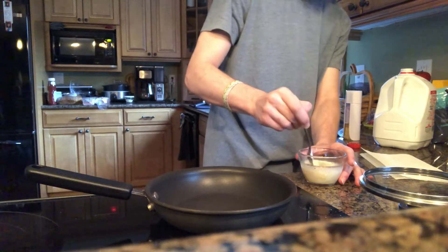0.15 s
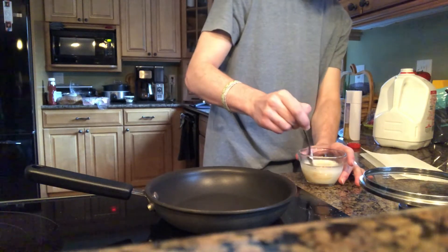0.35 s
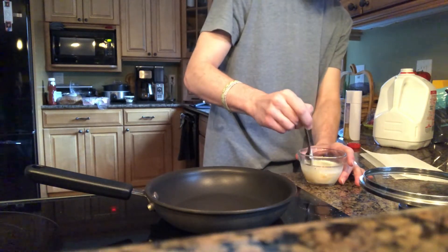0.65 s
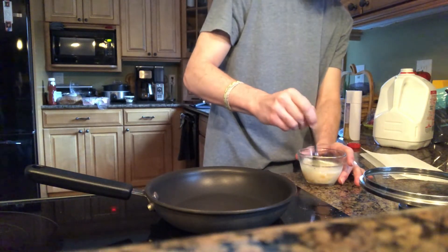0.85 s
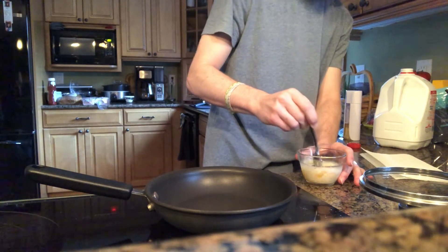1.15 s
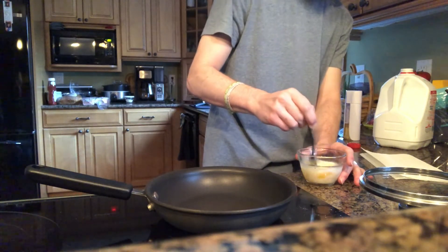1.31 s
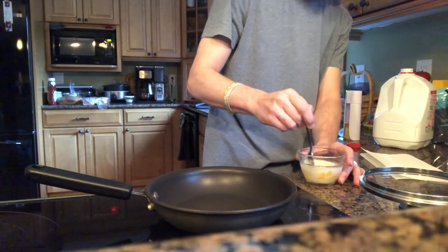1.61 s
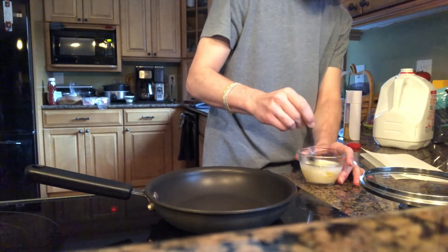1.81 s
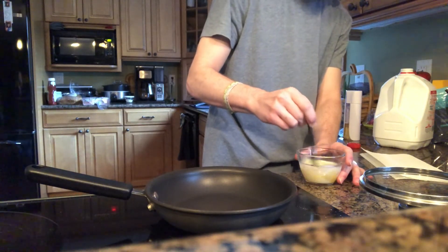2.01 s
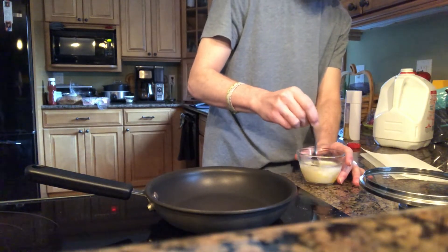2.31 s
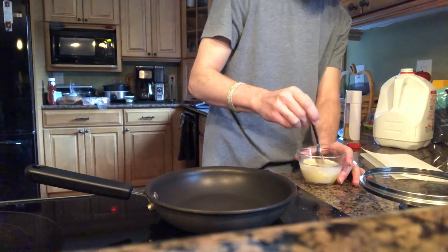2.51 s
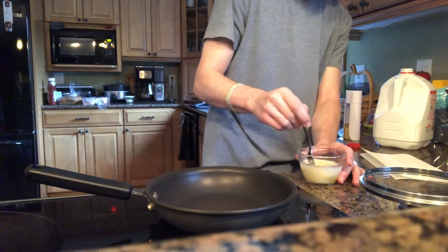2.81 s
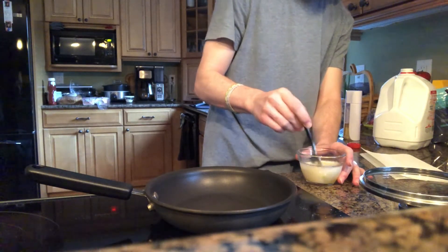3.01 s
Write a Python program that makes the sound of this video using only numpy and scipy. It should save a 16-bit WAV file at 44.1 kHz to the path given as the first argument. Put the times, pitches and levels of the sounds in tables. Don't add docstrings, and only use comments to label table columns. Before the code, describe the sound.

Fork tines click in a glass bowl of egg after two ringing rim taps, over kitchen hum.

```python
import sys
import numpy as np
from scipy import signal
from scipy.fft import rfft, irfft
from scipy.io import wavfile
from scipy.ndimage import uniform_filter1d

SR = 44100
rng = np.random.default_rng(int(sys.argv[2]) if len(sys.argv) > 2 else 0)


def level_to_linear(level):
    exponent = np.asarray(level, float) / 20
    return 10 ** exponent


def transcribe(u):
    v = np.clip(np.atleast_2d(u).T, -1, 1)
    q = np.round(v * 32767).astype(np.int16)
    wavfile.write(sys.argv[1], SR, q)


N = 138915
T = np.arange(SR // 2) / SR
UPPER_HZ, TOP_HZ = 8000, 12000
RUMBLE_HZ, CUT_HZ, EDGE_HZ = 42, 15800, 16950


def ring(hz, db, t60, rise=0.00013, phase=0.):
    decay = level_to_linear(db - 60 * T / max(t60, 1e-3))
    return decay * (1 - np.exp(-T / rise)) * np.sin(2 * np.pi * hz * T + phase)


def add(out, x, s):
    i = int(s * SR)
    out[i:i + len(x)] += x[:N - i]


def band(x, lo_hz, hi_hz):
    return signal.sosfilt(signal.butter(3, [lo_hz, hi_hz], "band", fs=SR, output="sos"), x)


def crack(db, t60, lo_hz):
    return band(rng.standard_normal(len(T)), lo_hz, EDGE_HZ) * level_to_linear(db - 60 * T / t60)


def waver():
    depth_db, k = 2, int(0.006 * SR)
    walk = uniform_filter1d(rng.standard_normal(len(T)), size=k)
    walk = uniform_filter1d(walk, size=k)
    return level_to_linear(depth_db * np.sqrt(3.25 * k) * walk)


# start in seconds, peak in dB, contact pitch in Hz,
# upper modes in dB, top modes in dB.
BLOWS = [(0.7129, -36, 6580, 8.5, 2), (0.8345, -33.5, 6170, 5, 1), (0.9508, -32.5, 6380, 5.5, 0.5),
         (0.9865, -32, 6330, 3.5, 2.5), (1.0732, -28.5, 6460, 3.5, 4), (1.1268, -28.5, 6430, -35, 4.5),
         (1.494, -30, 6260, 2.5, -2.5), (1.554, -30, 6340, 0.5, 2), (1.6991, -41, 6370, 7, 5),
         (1.8328, -35, 6440, 10.5, 5), (1.9839, -33, 6470, 5.5, 5), (2.2126, -28.5, 6460, 6.5, 2),
         (2.4671, -25.5, 6500, 4.5, 1.5), (2.624, -27.5, 6180, 4.5, 2), (2.855, -34.5, 6160, 8.5, 7)]
# start in seconds, peak in dB, contact pitch in Hz,
# upper modes in dB, top modes in dB.
GRAZES = [(0.661, -39, 6830, 5, -8), (0.8204, -39, 6700, 6, -1), (1.272, -31.5, 7100, 0.5, -9),
          (1.287, -43.5, 7550, 6, 4), (1.3578, -42.5, 6960, 2, -19), (1.3645, -31.5, 6870, 1, 1.5),
          (1.6723, -41.5, 6700, 4, -2), (1.7922, -38, 6460, 3, 4), (2.0928, -39.5, 6900, 2.5, -3),
          (2.107, -49, 5930, 7, -9), (2.2762, -44, 6800, 5, -9), (2.388, -39.5, 6350, -4, -1),
          (2.5321, -39, 6900, 5.5, -2), (2.9941, -31, 6430, -6, -7), (3.001, -51, 5900, -2, -6),
          (3.1261, -29.5, 6540, 1, -4)]
# pitch in Hz, level in dB, decay time t60 in seconds.
WET_HZ = [1850, 3600, 4400, 5399, 8400, 10550, 11200, 12800, 14960, 15500]
WET_DB = [-21.5, -19, -20, -13, -22, -16, -22, -13, -6.5, -8]
WET_T60_S = [.02, .005, .02, .008, .008, .009, .006, .007, .006, .006]
CONTACT_T60_S, CONTACT_SAG = .008, .06
CRACK_DB, CRACK_T60_S = -13, 0.0094
WASH_DB, WASH_T60_S = -21.5, 0.073
RATTLE_DB, RATTLE_T60_S = -26, 0.02
ECHO_S, ECHO_DB = .0066, -8
SCATTER_DB = 1.8


def tines(rows, low_db, crack_hz):
    out = np.zeros(N)
    for s, db, hz, upper_db, top_db in rows:
        chance = rng.standard_normal((len(WET_DB), 3))
        sagging_hz = hz * (1 - CONTACT_SAG * np.tanh(T / CONTACT_T60_S))
        x = ring(hz, -1.95, CONTACT_T60_S) + ring(sagging_hz, -15.5, 0.5 * CONTACT_T60_S)

        snap = crack(CRACK_DB, CRACK_T60_S, crack_hz) + crack(WASH_DB, WASH_T60_S, crack_hz)
        x = x + level_to_linear(-1.0) * band(snap, crack_hz, UPPER_HZ)
        x = x + level_to_linear(upper_db) * band(snap, UPPER_HZ, TOP_HZ)
        x = x + level_to_linear(top_db) * (band(snap, TOP_HZ, CUT_HZ) + level_to_linear(-24) * band(snap, CUT_HZ, EDGE_HZ))

        for f, mode_db, t60, (a, b, p) in zip(WET_HZ, WET_DB, WET_T60_S, chance):
            if f > TOP_HZ:
                tilt_db = top_db
            elif f > UPPER_HZ:
                tilt_db = upper_db
            else:
                tilt_db = 0 if f > 5800 else low_db
            struck_hz = f * (1 + 0.022 * b * (t60 < .03))
            x = x + ring(struck_hz, mode_db + tilt_db + SCATTER_DB * a, t60, phase=9 * p)

        push = rng.standard_normal(len(T)) * level_to_linear(RATTLE_DB - 60 * T / RATTLE_T60_S)
        push[0] = 1
        push[int(SR * ECHO_S * (1 + .06 * chance[0, 1]))] += level_to_linear(ECHO_DB)
        add(out, level_to_linear(db) * signal.fftconvolve(x, push)[:len(T)], s)
    return out


# start in seconds, slow mode in dB,
# wall pair in dB, foot mode in dB.
RINGS = [(0.7144, -75, -66, -60), (0.8338, -75, -67.5, -50), (0.9508, -69, -69, -50),
         (0.9865, -65, -68, -40.5), (1.0752, -60, -63, -41), (1.1288, -78, -56.5, -40),
         (1.3645, -70, -64, -47), (1.492, -66, -71, -42), (1.553, -68, -67, -51), (1.6991, -83, -61, -54),
         (1.8328, -74, -65, -49), (1.983, -67, -65, -50), (2.2107, -57, -57, -43), (2.388, -75, -66, -67),
         (2.466, -72, -54, -46), (2.624, -56, -71, -42), (2.855, -58, -59.5, -41), (3.1261, -68, -62, -57)]
# start in seconds, pitch in Hz, level in dB.
HIGH_RINGS = [(0.66, 10700, -57), (0.7129, 8270, -60), (0.9865, 13100, -58), (1.0745, 10500, -54),
              (1.126, 12230, -60), (1.1276, 8500, -58), (1.554, 11030, -62), (1.554, 8340, -60),
              (1.6991, 12700, -65), (1.6986, 8400, -61), (1.7922, 10600, -56.5), (1.8328, 10400, -58),
              (2.624, 10600, -50), (2.625, 8800, -58), (2.856, 10550, -55), (2.9941, 8500, -58),
              (2.9941, 12150, -53.5), (3.1261, 10650, -51)]
SLOW_HZ, SLOW_T60_S = 4818, .2
PAIR_HZ, PAIR_T60_S = (6100, 6385), .16
FOOT_HZ, FOOT_T60_S = 1390, .035
HIGH_WIDTH_HZ, HIGH_T60_S = 200, .12


def rings():
    out = np.zeros(N)
    for s, slow_db, pair_db, foot_db in RINGS:
        pair = sum(waver() * ring(f, pair_db, PAIR_T60_S, phase=9 * rng.random()) for f in PAIR_HZ)
        slow = waver() * ring(SLOW_HZ, slow_db, SLOW_T60_S, rise=0.0059)
        foot = ring(FOOT_HZ, foot_db, FOOT_T60_S, rise=0.0016)
        add(out, pair + slow + foot, s)
    for s, hz, db in HIGH_RINGS:
        add(out, band(crack(db + 15.5, HIGH_T60_S, 5000), hz - HIGH_WIDTH_HZ, hz + HIGH_WIDTH_HZ), s)
    return out


# start in seconds, peak in dB, upper modes in dB, long-ringing modes in dB.
TAPS = [
    (0.2353, -24, -1.5, -7),
    (0.3748, -33, -3.5, 0),
]
# pitch in Hz, level in dB, decay time t60 in seconds.
RIM_HZ = [1897, 1985, 2094, 2232, 4738, 4818, 4856, 7973, 8700, 8810, 8755, 10650, 13670, 13720]
RIM_DB = [-4, -15.5, -12.5, -12.5, -6, -6.5, -5, -10.5, 3, 4, -31, -11, -4, -21.5]
RIM_T60_S = [.05, .3, .06, .04, .07, .26, .06, .025, .08, .06, .17, .03, .05, .11]
# pitch in Hz, level in dB, decay time t60 in seconds.
BASE = [(741, -12.5, 0.23), (1090, -8, 0.023), (1445, -3, 0.022), (1770, -2.5, 0.017), (3320, -5, 0.013)]
SET_DOWN_S, SET_DOWN_DB = .279, -21.5
ROCK_S, ROCK_DB = 0.00643, 3.5


def rim():
    out = np.zeros(N)
    for s, db, upper_db, long_db in TAPS:
        x = band(crack(0, 0.025, 800), 800, 12000) + crack(-11.5, 0.0096, 9500)
        x = x + band(crack(-17, 0.16, 2900), 2400, 7100) + band(crack(6, .03, 5200), 5800, 7300)
        for f, mode_db, t60 in zip(RIM_HZ, RIM_DB, RIM_T60_S):
            is_long = t60 > .15
            level_db = mode_db + upper_db * (f > 6000) + long_db * is_long
            x = x + (waver() if is_long else 1) * ring(f, level_db, t60, phase=9 * rng.random())
        add(out, level_to_linear(db) * x, s)

    foot = level_to_linear(SET_DOWN_DB) * sum(ring(f, mode_db, t60, rise=0.0015) for f, mode_db, t60 in BASE)
    grit = band(crack(SET_DOWN_DB - 11.5, 0.13, 640), 540, 3700)
    add(out, foot + grit, SET_DOWN_S)
    add(out, ring(BASE[0][0], SET_DOWN_DB + ROCK_DB, 0.023, rise=0.0033), SET_DOWN_S + ROCK_S)
    return out


# start in seconds, peak in dB, pitch in Hz, decay time t60 in seconds, rebound in dB.
KNOCKS = [(0.241, -29, 340, 0.054, -20), (0.285, -19.5, 335, 0.063, -31), (0.718, -30, 337, 0.08, -9.5),
          (0.84, -25, 339.4, 0.16, -5.5), (0.956, -28, 338, 0.037, -2), (0.99, -22, 331, 0.05, -28),
          (1.077, -26, 344.5, 0.25, -2.5), (1.132, -22.5, 342, 0.11, -6), (1.274, -42, 324, 0.088, -5),
          (1.369, -26.5, 330, 0.076, -12), (1.498, -26, 342, 0.032, -6), (1.558, -26.5, 341, 0.13, -4.5),
          (1.7, -37, 336, 0.07, -14), (1.796, -33.5, 334, 0.034, -19), (1.84, -31, 336.5, 0.21, -2.5),
          (1.989, -24, 334, 0.066, -7), (2.123, -39, 350, 0.077, -2), (2.217, -26.5, 345, 0.046, -40),
          (2.395, -32, 324, 0.034, -9), (2.472, -26, 334, 0.055, -19), (2.629, -27.5, 328.5, 0.091, -38),
          (2.638, -32.5, 328, 0.02, -12), (2.86, -29, 333, 0.08, -42.5), (2.869, -39, 331, .05, -9.5),
          (2.999, -40.5, 330, 0.056, -9), (3.131, -36.5, 322, 0.07, -5)]
# start in seconds, peak in dB, pitch in Hz, decay time t60 in seconds.
SHUDDERS = [(0.271, -61, 60, 0.46), (0.843, -41, 63, 0.3), (0.993, -45.5, 60, 0.27), (1.092, -49, 60, 0.21),
            (1.141, -42.5, 63, 0.24), (1.26, -47.5, 60, 0.31), (1.402, -61, 60, 0.34),
            (1.499, -61, 60, 0.36), (1.569, -48.5, 60, 0.23), (1.7, -49.5, 62.6, 0.07),
            (1.851, -40, 60, 0.28), (1.998, -50.5, 60, 0.62), (2.11, -44.5, 60, 0.49),
            (2.229, -49, 60, 0.2), (2.628, -48, 60, 0.22), (3.03, -42, 60, 0.07)]
REBOUND_S, KNOCK_RISE_S, SHUDDER_RISE_S = 0.00809, 0.0024, 0.0046


def counter():
    out = np.zeros(N)
    for s, db, hz, t60, rebound_db in KNOCKS:
        x = ring(hz, db + 3, t60, KNOCK_RISE_S) + ring(421, db - 3.5, 0.026, KNOCK_RISE_S)
        x = x + ring(170, db - 17.0, 0.01, KNOCK_RISE_S) + ring(723, db - 12.5, 0.047, KNOCK_RISE_S)
        add(out, -x, s + 0.00076)
        add(out, -level_to_linear(rebound_db) * x, s + REBOUND_S)
    for s, db, hz, t60 in SHUDDERS:
        x = ring(hz, db + 6.5, t60, SHUDDER_RISE_S) + ring(1.2 * hz, db, 0.13, SHUDDER_RISE_S)
        add(out, x, s)
    return out


# start in seconds, length in seconds, level in dB.
SLOPS = [
    (0.291, 0.14, -51),
    (0.489, 0.075, -66.5),
    (1.44, 0.024, -70),
    (1.776, 0.074, -63),
    (2.612, 0.084, -54),
    (2.686, 0.017, -63),
]


def slops():
    out = np.zeros(N)
    for s, length_s, db in SLOPS:
        swell = np.sin(np.pi * np.clip(T / length_s, 0, 1))
        rush = band(rng.standard_normal(len(T)), 280, 1470) * 4
        add(out, level_to_linear(db) * waver() * swell * rush, s)
    return out


SCRAPE_S, SCRAPE_LEN_S, SCRAPE_DB = 0.14, 0.08, -65


def scrape():
    t = np.clip((np.arange(N) / SR - SCRAPE_S) / SCRAPE_LEN_S, 0, 1)
    swell = np.sqrt(np.sin(np.pi * t) ** 2)
    n = rng.standard_normal(N)
    return level_to_linear(SCRAPE_DB) * swell * (band(n, 7300, 9200) + level_to_linear(14) * band(n, 2200, 2500))


# pitch in Hz, level in dB per Hz.
HUM = [(26, -17.5), (45, 0), (117, 3), (346, -2.5), (476, -8), (672, 0), (1240, -14.5), (4920, -40),
       (16000, -47)]
HUM_DB, HISS_DB = -48.5, -80


def hum():
    f = np.fft.rfftfreq(N, 1 / SR)
    hz_db = np.array(HUM)
    floor_db = np.interp(np.log(f + 1), np.log(hz_db[:, 0]), hz_db[:, 1])
    shape = level_to_linear(floor_db - 35 * (f > CUT_HZ))
    humps = [(60, 5.3, 12.5), (162.6, 10.7, 5.1), (442.0, 108, 10.0),
             (710, 99, 3.24), (5170, 2180, 7.2), (12100, 3400, 1.2)]
    for hz, width_hz, db in humps:
        shape = shape * level_to_linear(db * np.exp(-((f - hz) / width_hz) ** 2))
    x = irfft(rfft(rng.standard_normal(N)) * shape, N)
    walk = uniform_filter1d(rng.standard_normal(N), size=3000) * np.sqrt(3000)
    hiss = level_to_linear(HISS_DB) * band(rng.standard_normal(N), 7000, CUT_HZ)
    return x / x.std() * level_to_linear(HUM_DB + 1.4 * walk) + hiss


GRAZE_HZ, GRAZE_LOW_DB, GRAZE_ROOM_DB = 5900, -16, -9
ROOM_DB, ROOM_T60_S, ROOM_GAP_S = -12.5, 0.34, 0.0013
TREBLE_DB, TREBLE_T60_S = 3, 0.23


def room(x):
    noise = rng.standard_normal(len(T)) * (T > ROOM_GAP_S)
    tail = band(noise, 566.3, 10000) * level_to_linear(-60 * T / ROOM_T60_S)
    tail = tail + band(noise, 8150, CUT_HZ) * level_to_linear(TREBLE_DB - 60 * T / TREBLE_T60_S)
    return signal.fftconvolve(x, tail / np.sqrt(np.sum(tail ** 2)))[:N]


def scene():
    grazes = band(tines(GRAZES, GRAZE_LOW_DB, GRAZE_HZ), 4950, EDGE_HZ)
    glass = tines(BLOWS, 0, 1000) + rim() + rings()
    tail = level_to_linear(ROOM_DB) * room(glass + level_to_linear(GRAZE_ROOM_DB) * grazes)
    mix = glass + grazes + tail + counter() + slops() + scrape() + hum()
    return mix[None]


def low_pass(x):
    return signal.sosfilt(signal.butter(12, 17170, fs=SR, output="sos"), x)


EDGE_GATE_DB, EDGE_HOLD_S = -60, .002


def record(dry):
    x = signal.sosfilt(signal.ellip(8, .5, 60, CUT_HZ, fs=SR, output="sos"), dry)
    edge_filter = signal.ellip(5, .5, 60, [CUT_HZ, EDGE_HZ], "band", fs=SR, output="sos")
    edge = signal.sosfilt(edge_filter, dry)
    power = uniform_filter1d(edge ** 2, size=int(EDGE_HOLD_S * SR))
    gate = power ** 2 / (power ** 2 + level_to_linear(EDGE_GATE_DB) ** 4)
    x = x + edge * gate
    x = signal.sosfilt(signal.butter(6, RUMBLE_HZ, "high", fs=SR, output="sos"), x)
    return low_pass(x)


dry = scene()
out = record(dry)
transcribe(out)
```